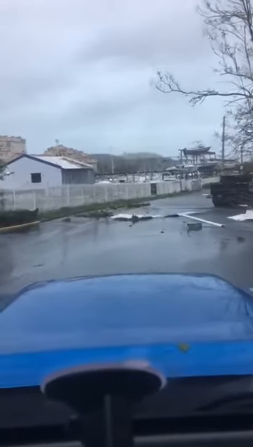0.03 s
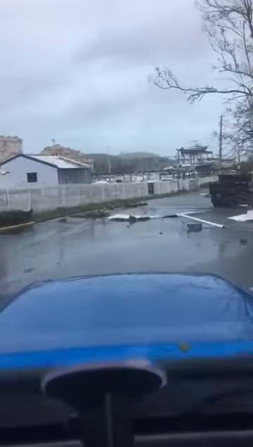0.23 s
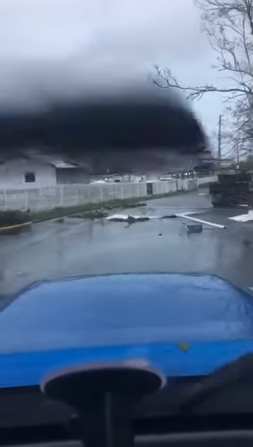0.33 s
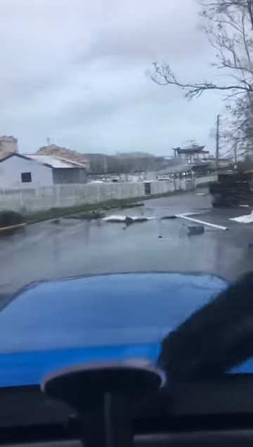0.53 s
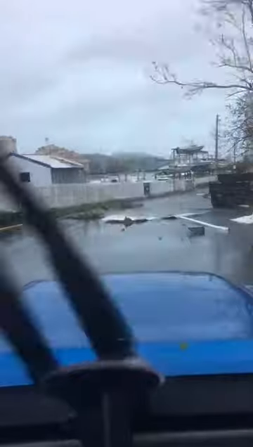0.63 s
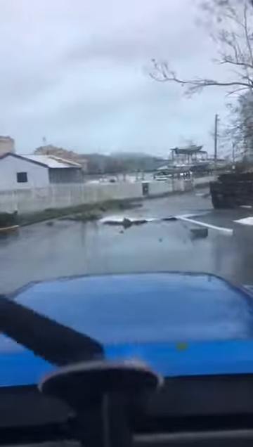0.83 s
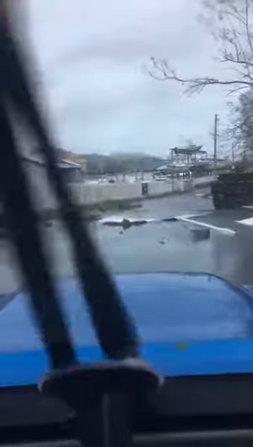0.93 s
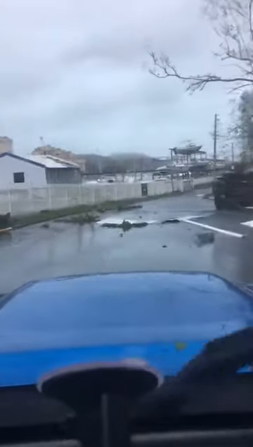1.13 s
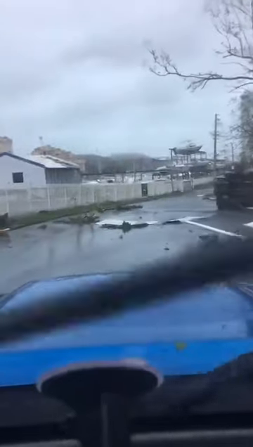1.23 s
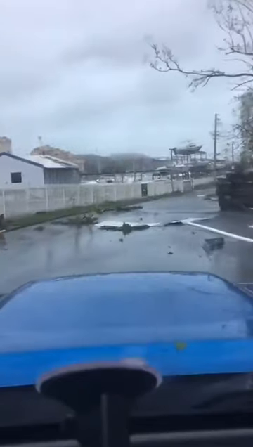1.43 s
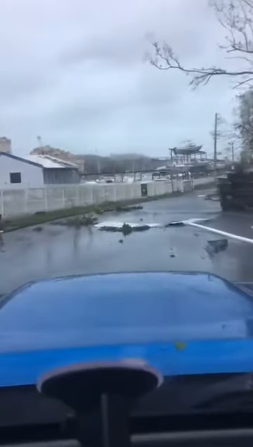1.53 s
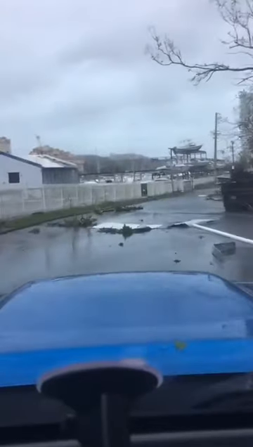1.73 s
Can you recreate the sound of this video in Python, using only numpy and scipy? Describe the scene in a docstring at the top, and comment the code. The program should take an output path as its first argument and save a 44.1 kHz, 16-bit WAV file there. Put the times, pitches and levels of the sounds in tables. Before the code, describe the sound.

A windshield wiper sweeps once, heard close inside a car over low cabin rumble. At about 0.25 seconds the rubber snaps loose, then judders and groans loudly against the glass until 0.5. It swishes on with a very faint motor whine, turning over with dull thumps between 0.8 and 1.1. It flutters softly back and parks with a click and a thud near 1.5 seconds, leaving the rumble.

```python
"""Inside a car, one microphone close behind the windshield, over low cabin rumble.
A wiper makes one sweep, its motor whining faintly. The rubber tears loose, then sticks and slips
on the way up, juddering and groaning against the glass. It swishes on, turns over with a dull
thump of the linkage, chatters softly on the way back and parks with a click and a thud.
The padded cabin adds a short echo."""
import sys
import numpy as np
from scipy import signal
from scipy.io import wavfile
from scipy.ndimage import uniform_filter1d

SR = 44100
rng = np.random.default_rng(int(sys.argv[2]) if len(sys.argv) > 2 else 0)


def wav_record(signal):
    """Record a signal, one row per channel, as 16-bit PCM in the file named by sys.argv[1]."""
    frames = np.transpose(np.atleast_2d(signal))
    bounded = np.clip(frames, -1, 1)
    # unit amplitude maps onto the largest positive 16-bit level
    quanta = np.round(bounded * 32767).astype(np.int16)
    wavfile.write(sys.argv[1], SR, quanta)


N = 79380
T = np.arange(N) / SR


def amp(db):
    """Decibels to gain."""
    return 10 ** (np.asarray(db) / 20)


def unit(x):
    """Scales to rms 1."""
    return x / np.sqrt(np.mean(x ** 2) + 1e-20)


def noise():
    """White noise."""
    return rng.standard_normal(N)


def wander(samples):
    """Random drift of rms 1, smoothed over the given number of samples."""
    return unit(uniform_filter1d(uniform_filter1d(noise(), samples), samples))


def curve(table, column=1):
    """One column of a table, joined by straight lines in time."""
    rows = np.array(table)
    return np.interp(T, rows[:, 0], rows[:, column])


def level(table, column):
    """Gain from a dB column, fading out beyond its ends."""
    outside_s = np.maximum(np.maximum(table[0][0] - T, T - table[-1][0]), 0)
    return amp(curve(table, column)) * np.exp(-outside_s * 200)


def colour(x, spectrum):
    """Causal filter of unit energy, shaped like the given spectrum."""
    hz, db = np.transpose(spectrum)
    bins_hz = abs(np.fft.fftfreq(8192, 1 / SR))
    log_gain = np.log(amp(np.interp(np.log(bins_hz + 1), np.log(hz), db)))
    minimum_phase = np.exp(np.conj(signal.hilbert(log_gain)))
    taps = np.fft.ifft(minimum_phase).real[:len(bins_hz) // 2]
    return signal.fftconvolve(x, taps / np.linalg.norm(taps))[:N]


def resonate(x, hz, width_hz):
    """A resonance of gain 1; hz may be a curve."""
    turn = np.exp(2j * np.pi * np.cumsum(hz * np.ones(N)) / SR)
    pole = np.exp(-np.pi * abs(width_hz) / SR)
    return 2 * (turn * signal.lfilter([1 - pole], [1, -pole], x / turn + 1e-18)).real


def whistle(hz, width_hz):
    """A fuzzy tone of rms 1: noise through a steep resonance."""
    return unit(resonate(resonate(noise(), hz, width_hz), hz, width_hz))


# Room tone of the cabin, all around the microphone: freq_hz, gain_db
CABIN_SPECTRUM = [(18, -33), (35, -11), (56, 3), (80, -8), (135, -6), (170, -13), (240, -14), (330, -18),
                  (400, -23.5), (650, -31), (980, -30), (1400, -38.5), (2000, -46.5), (3000, -49),
                  (4500, -55), (9500, -64.5), (11000, -71.5)]

def cabin(level_db=-37.5, swell_db=2):
    """Lumpy low rumble under a steady hiss."""
    air = unit(colour(noise(), CABIN_SPECTRUM))
    rumble = signal.sosfiltfilt(signal.butter(2, 150, fs=SR, output="sos"), air)
    hiss = air - rumble
    return amp(level_db) * (hiss + rumble * amp(swell_db * wander(1500)))


def cabin_echo(x, wet_db=-9, t60_s=.07):
    """The direct sound, then the short, dense echo of a small padded cabin."""
    tail = noise() * amp(-60 * T / t60_s) * (T > .002)
    tail = signal.sosfilt(signal.butter(2, 350, "high", fs=SR, output="sos"), tail)
    return x + amp(wet_db) * signal.fftconvolve(x, tail / np.linalg.norm(tail))[:N]


# Wiper motor, faint from inside the car: pitch_hz, width_hz, level_db
MOTOR_TONES = [(1198.5, 56, -62), (1872, 27, -70)]

def motor(on_s=.22, off_s=1.415, ramp_s=.094, load_sag=.015, load_db=2):
    """Fuzzy gear whine while the arm moves; speed and level waver with the load."""
    running = np.clip(np.minimum(T - on_s, off_s - T) / ramp_s, 0, 1)
    load = wander(2000)
    speed = 1 - load_sag * load
    whine = sum(amp(db) * whistle(hz * speed, width) for hz, width, db in MOTOR_TONES)
    return running * amp(load_db * load) * whine


# The blade's swish, on the far side of the glass: time_s, rub_db, hiss_db
SLIDE_LEVELS = [(0, -50.5, -91), (.19, -46.5, -97), (.245, -37, -60), (.52, -34.5, -62.5),
                (.62, -46.5, -67), (.75, -45.5, -63.5), (.8, -43, -76), (.85, -43, -84),
                (.93, -48.5, -91.5), (1.06, -42, -71.5), (1.18, -50, -87), (1.3, -43.5, -78),
                (1.39, -46.5, -97), (1.46, -36.5, -75), (1.52, -52.5, -90)]
# Tone of the rub and of the hiss: freq_hz, gain_db
RUB_SPECTRUM = [(100, -9.5), (240, 9), (420, -6), (650, -3.5), (1000, -13), (1300, -12), (2000, -24),
                (2800, -24), (4500, -49.5), (10000, -53)]
HISS_SPECTRUM = [(1000, -1.5), (2800, 10), (4000, 3.5), (6000, -1.5), (9000, -7.5), (10500, -12.5)]

def slide(grain_db=1.5):
    """Rubber sliding on wet glass gives a grainy rub and a thin hiss."""
    grain = unit(amp(grain_db * wander(120)))
    rub = colour(noise() * grain, RUB_SPECTRUM) * level(SLIDE_LEVELS, 1)
    hiss = colour(noise() * grain, HISS_SPECTRUM) * level(SLIDE_LEVELS, 2)
    return rub + hiss


# Squeaks that barely reach the microphone: peak_s, half_length_s, pitch_hz, width_hz, level_db
RUBBER_SQUEAKS = [(.2575, .0045, 4280, 400, -52), (1.078, .005, 4500, 5000, -66),
                  (1.471, .014, 9700, 1600, -71), (1.581, .005, 5200, 6000, -70)]

def squeak(peak_s, half_length_s, pitch_hz, width_hz, level_db):
    """A tiny chirp or spit of wet rubber."""
    return amp(level_db) * np.exp(-((T - peak_s) / half_length_s) ** 2) * whistle(pitch_hz, width_hz)


# Linkage, heard through the car body: start_s, rise_s, decay_s, pitch_hz, level_db, upper_hz, upper_db
LINKAGE_THUMPS = [(0.163, 0.0086, 0.015, 88.7, -25.5, 155.5, -28.5),
                  (0.208, 0.021, 0.023, 93.3, -21.5, 235.2, -31.5),
                  (0.259, 0.023, 0.032, 90.6, -27, 184.9, -14.5),
                  (0.59, 0.0053, 0.0059, 90, -20.5, 178, -42), (0.629, 0.025, 0.073, 96.5, -29.5, 182, -45),
                  (0.753, 0.007, 0.024, 61.6, -24.5, 198, -59),
                  (0.839, 0.0089, 0.12, 57.6, -28.5, 209.2, -36.5),
                  (.864, 0.0017, 0.019, 103.5, -18.5, 302, -35.5),
                  (0.94, 0.011, 0.018, 169, -28, 255.7, -34),
                  (1.02, 0.029, 0.02, 177.5, -25.5, 228.8, -25.5),
                  (1.046, 0.023, 0.048, 75.7, -16.5, 141, -34.5),
                  (1.083, 0.0046, 0.048, 140.8, -23, 224, -24.5),
                  (1.09, 0.011, 0.0088, 109.4, -35, 283, -29), (1.463, 0.0062, 0.03, 85.5, -21, 176.5, -25),
                  (1.491, 0.0059, 0.021, 65, -22.5, 229, -30)]

def thump(start_s, rise_s, decay_s, pitch_hz, level_db, upper_hz, upper_db):
    """A soft push of the linkage swells and dies in two low body modes."""
    t = np.maximum(T - start_s, 0)
    swell = np.sin(np.pi / 2 * np.minimum(t / rise_s, 1)) ** 2
    fade = np.exp(-np.maximum(t - rise_s, 0) / decay_s)
    lower = amp(level_db) * np.sin(2 * np.pi * pitch_hz * t)
    upper = amp(upper_db) * np.sin(2 * np.pi * upper_hz * t)
    return swell * fade * (lower + upper)


# Ringing of glass and wiper arm, just ahead of the microphone: pitch_hz, width_hz, gain_db
GLASS_MODES = [(440, 30, -8), (540, 26, -4), (670, 22, -7), (718, 22, 1), (775, 20, -4), (829, 20, -5),
               (981, 22, -3), (1130, 40, -8), (1232, 22, -4), (2420, 100, -21), (2800, 70, -24)]
# Body of a knock on the glass: freq_hz, gain_db
KNOCK_SPECTRUM = [(100, -46), (250, -21), (350, 9), (480, 3), (600, 1.5), (790, -5), (920, -3.5),
                  (1280, -3), (1550, -18.5), (2200, -19), (5000, -68.5)]

def windshield(strikes, ring_db=-3):
    """The struck windshield answers with a broad knock plus its ringing."""
    ring = sum(amp(db) * resonate(strikes, hz, width) for hz, width, db in GLASS_MODES)
    ring = signal.sosfilt(signal.butter(2, 3000, fs=SR, output="sos"), ring)
    return colour(strikes, KNOCK_SPECTRUM) + amp(ring_db) * unit(ring) * strikes.std()


# Sharp snaps of blade and arm, close by: start_s, knock_db, click_db, ring_db, decay_s
BLADE_SNAPS = [(0.233, -47, -85, -43, 0.0023), (0.2641, -21, -41, -27, 0.0041),
               (0.2776, -12, -26, -26, 0.0014), (0.2893, -11, -53, -28, 0.00082),
               (1.072, -69, -50, -79, 0.0051), (1.429, -38, -66, -57, 0.005),
               (1.4406, -50, -34.5, -46, 0.0029), (1.458, -34.5, -49, -58, 0.0052),
               (1.474, -55, -45, -46, 0.0034)]
# Bright edge of a snap: freq_hz, gain_db
CLICK_SPECTRUM = [(300, -7), (1200, 11), (2200, 12), (3400, 7), (4500, -2), (5500, -13), (9600, -23.5),
                  (11000, -20)]

def snaps():
    """The blade tears loose, flips over and clacks into its rest, setting glass and arm ringing."""
    knocks, clicks, ring = np.zeros((3, N))
    for start_s, knock_db, click_db, ring_db, decay_s in BLADE_SNAPS:
        t = np.maximum(T - start_s, 0)
        fade = (T >= start_s) * np.exp(-t / decay_s)
        knocks += amp(knock_db) * fade
        clicks += amp(click_db) * fade
        for k, (hz, width, db) in enumerate(GLASS_MODES):
            mode = np.exp(-np.pi * width * t) * np.sin(2 * np.pi * hz * t)
            ring += (-1) ** k * amp(ring_db + db) * mode
    return colour(knocks * noise(), KNOCK_SPECTRUM) + colour(clicks * noise(), CLICK_SPECTRUM) + ring


def stick_slip(rate_hz, start_s, jitter=.006, spread_db=.9, burst_s=.0028):
    """Rubber grips and lets go: a train of uneven pulses, and the noise burst that follows each."""
    cycles = np.cumsum(rate_hz * (T > start_s) * (1 + jitter * wander(200))) / SR
    pulses = np.diff(np.floor(cycles), prepend=0) * amp(spread_db * noise())
    bursts = signal.lfilter([1], [1, -np.exp(-1 / (burst_s * SR))], pulses)
    return pulses * np.sqrt(SR / rate_hz), unit(bursts) * noise()


def scatter(pulses, delay_s, spread_s=.00025):
    """Delays each pulse, a little more or less every time."""
    onsets = np.flatnonzero(pulses)
    lag = (delay_s + spread_s * rng.standard_normal(len(onsets))) * SR
    delayed = np.zeros(N)
    delayed[np.clip(onsets + lag.astype(int), 0, N - 1)] = pulses[onsets]
    return delayed


# Return stroke, soft at the microphone: time_s, slip_rate_hz, level_db
RETURN_STROKE = [(1.1, 82, -35.5), (1.17, 83, -26.5), (1.2, 95, -36.5), (1.232, 105.7, -23.5),
                 (1.27, 94.6, -39), (1.305, 86, -26.5), (1.33, 115, -40.5), (1.38, 82.4, -33.5),
                 (1.43, 91, -32)]
# Tone of one return slip: freq_hz, gain_db
CHATTER_SPECTRUM = [(25, -21.5), (60, -4), (100, 6.5), (180, -5), (280, -18.5), (400, -23), (1500, -96)]

def chatter(roughness=.48):
    """On the way back the wetted blade only flutters dully."""
    pulses, grit = stick_slip(curve(RETURN_STROKE), start_s=RETURN_STROKE[0][0])
    return colour(pulses + roughness * grit, CHATTER_SPECTRUM) * level(RETURN_STROKE, 2)


# The rubber's groan on the way up the glass: time_s, pitch_hz
GROAN_GLIDE = [(.28, 184), (.305, 208), (.345, 216), (.375, 208), (.405, 229), (.52, 238)]

def groan(jitter=.035, rough_db=1.8):
    """The loaded rubber groans, rising unsteadily in pitch as it drags."""
    pitch_hz = curve(GROAN_GLIDE) * (1 + jitter * wander(150))
    tone = np.sin(2 * np.pi * np.cumsum(pitch_hz) / SR)
    return unit(tone * amp(rough_db * wander(200)))


# Upstroke, loud and right in front of the microphone: time_s, slip_rate_hz
UPSTROKE_RATE = [(.267, 88), (.295, 86), (.305, 107), (.36, 108), (.378, 96), (.402, 120), (.43, 103),
                 (.52, 107)]
# Its layers: time_s, boom_db, groan_and_drum_db, knock_db, rasp_db
UPSTROKE_LEVELS = [(.2, -37, -58, -67, -71.5), (.25, -41, -30, -43.5, -86), (.27, -36, -16.5, -30, -43),
                   (.295, -26.5, -28, -34.5, -51), (.325, -18.5, -18.5, -28, -48.5),
                   (.372, -27, -24.5, -30.5, -47.5), (.402, -23, -18, -30.5, -50),
                   (.45, -21.5, -24, -39.5, -57.5), (.512, -31.5, -30, -47, -54.5),
                   (.533, -39, -36, -67, -70), (.58, -51, -68, -60, -65)]
# Low boom, hollow drumming of the glass and rasp of one slip: freq_hz, gain_db
BOOM_SPECTRUM = [(25, -64), (60, -9.5), (85, -1.5), (102, 3.5), (118, -12.5), (140, 2.5), (300, -31.5),
                 (1000, -89)]
DRUM_SPECTRUM = [(60, -55), (140, -17), (175, 7), (210, -1), (260, -1), (310, -5), (360, -4.5), (600, -47),
                 (2000, -88)]
RASP_SPECTRUM = [(300, -20), (1000, -2), (1600, -2), (2100, -2), (2500, -1), (2900, -3), (3300, -15),
                 (4300, -13), (5000, -16), (5900, -12), (7300, -18), (8600, -15), (11000, -29)]

def judder(roughness=.33, rebound_s=.0044, rebound_db=-4, groan_db=-3.5, drum_db=-5):
    """The blade grabs, slips and rebounds about a hundred times a second, drumming on the glass."""
    pulses, grit = stick_slip(curve(UPSTROKE_RATE), start_s=.1985)
    strikes = scatter(pulses, 0) + amp(rebound_db) * scatter(pulses, rebound_s)
    gritty_strikes = (1 - roughness) * strikes + roughness * grit
    knock = unit(windshield(gritty_strikes)) * level(UPSTROKE_LEVELS, 3)
    rasp = unit(colour(grit, RASP_SPECTRUM)) * level(UPSTROKE_LEVELS, 4)
    boom = colour(pulses, BOOM_SPECTRUM) * level(UPSTROKE_LEVELS, 1)
    groan_and_drum = amp(groan_db) * groan() + amp(drum_db) * colour(pulses, DRUM_SPECTRUM)
    low_end = boom + groan_and_drum * level(UPSTROKE_LEVELS, 2)
    return knock + rasp - low_end


def scene():
    """One sweep of the wiper over the cabin's room tone, in mono."""
    wiper = judder() + chatter() + snaps() + slide() + motor()
    wiper += sum(squeak(*row) for row in RUBBER_SQUEAKS)
    wiper += sum(thump(*row) for row in LINKAGE_THUMPS)
    return (cabin_echo(wiper) + cabin())[None]


def record(dry):
    """The recorder cuts the treble above 10.5 kHz."""
    lowpass = signal.firwin(511, 10500, window=("kaiser", 9), fs=SR)
    return signal.oaconvolve(dry, lowpass[None], "same")


dry = scene()
out = record(dry)
wav_record(out)
```